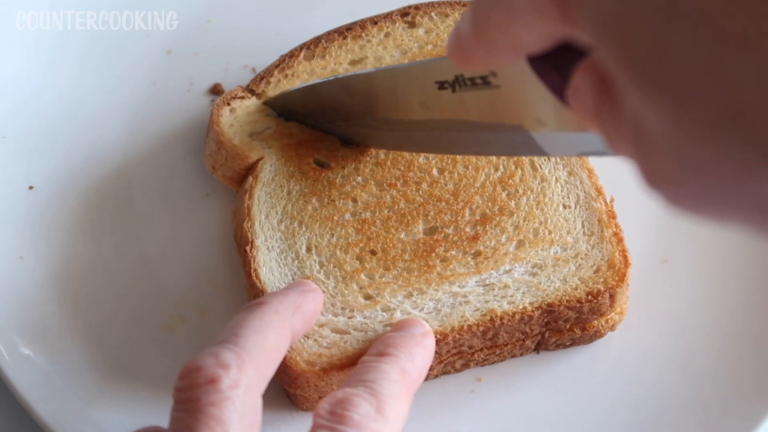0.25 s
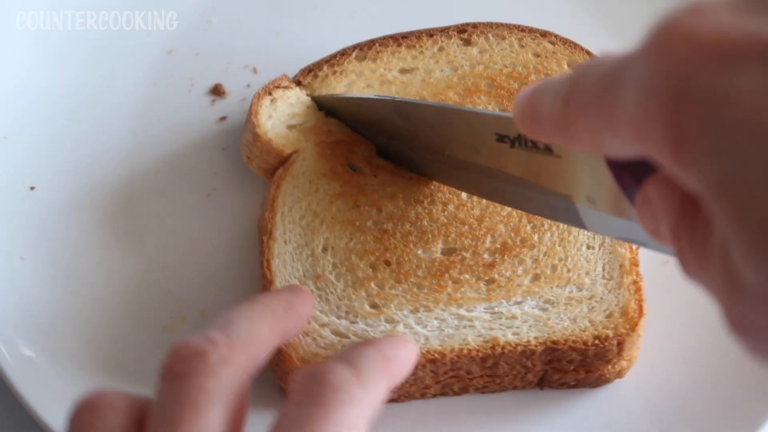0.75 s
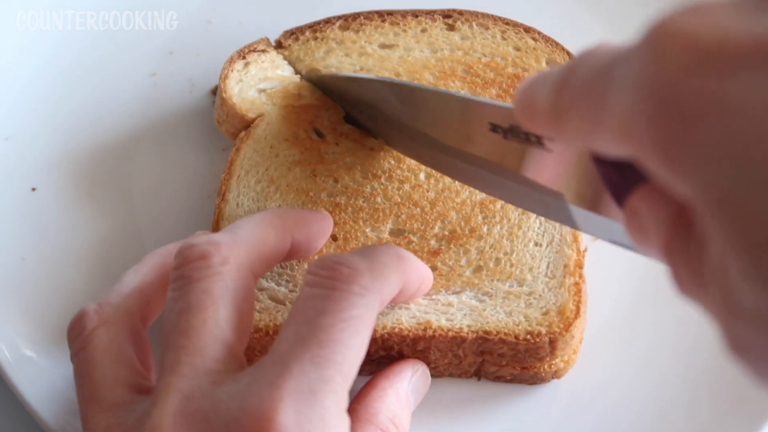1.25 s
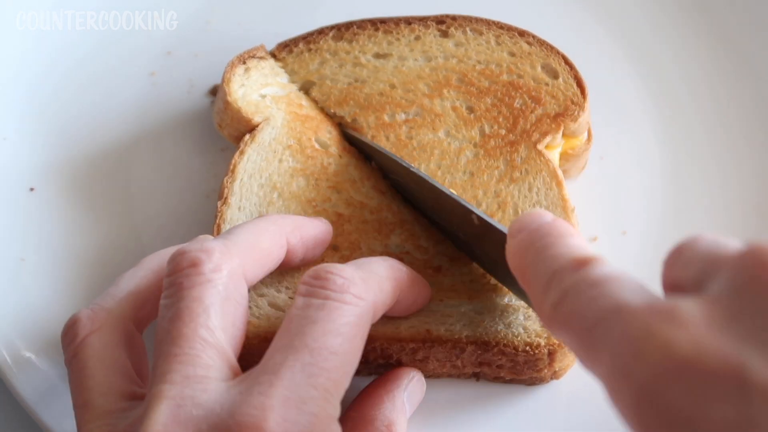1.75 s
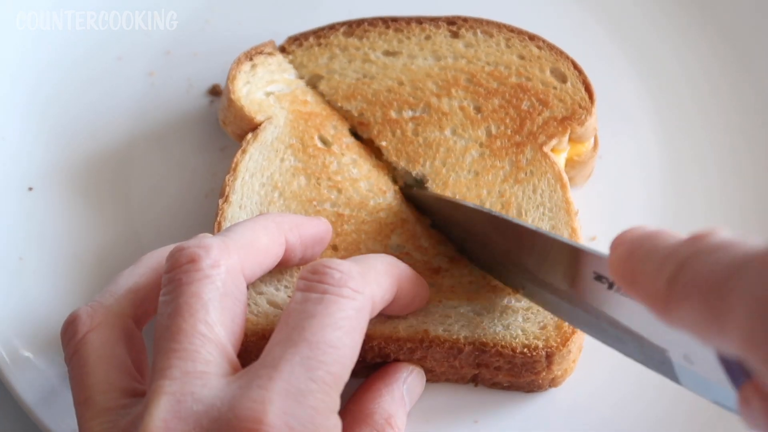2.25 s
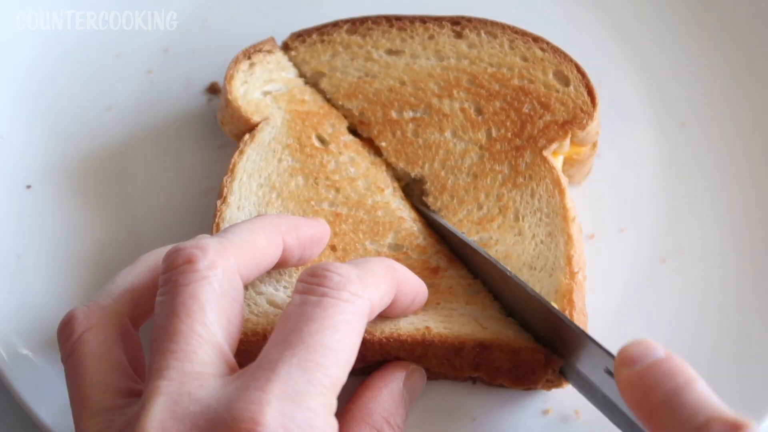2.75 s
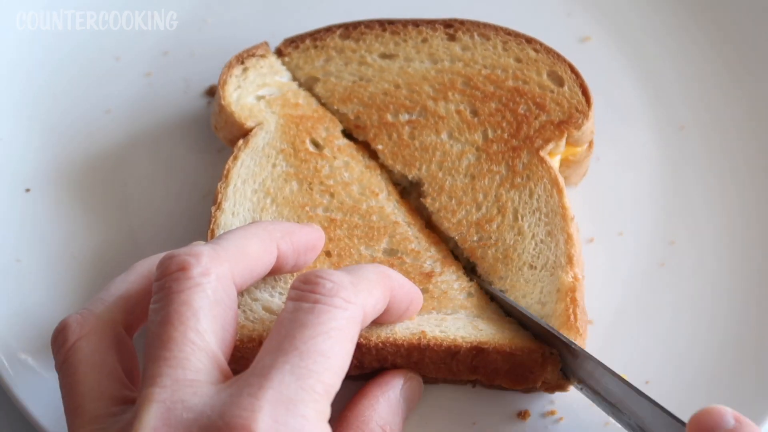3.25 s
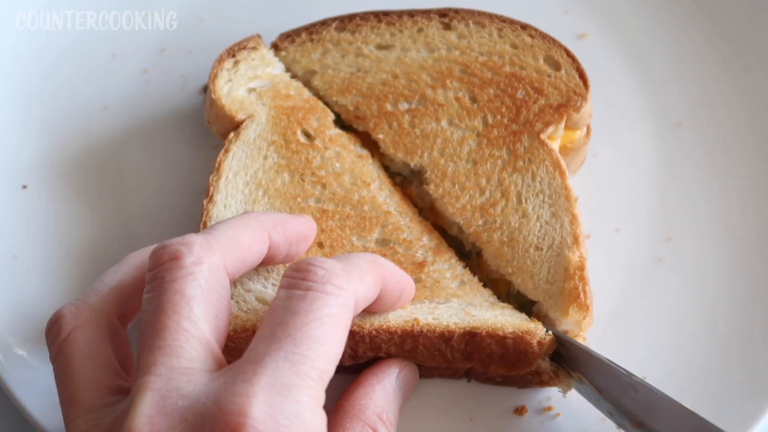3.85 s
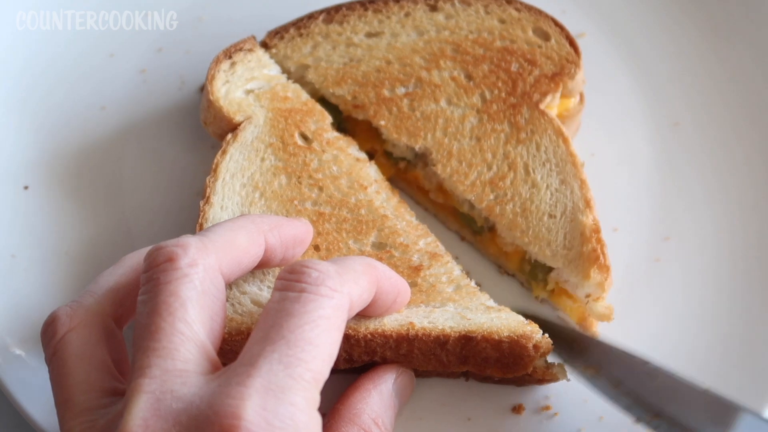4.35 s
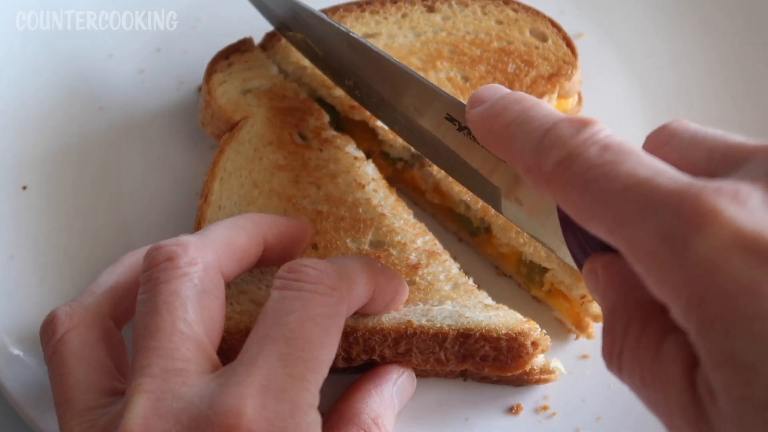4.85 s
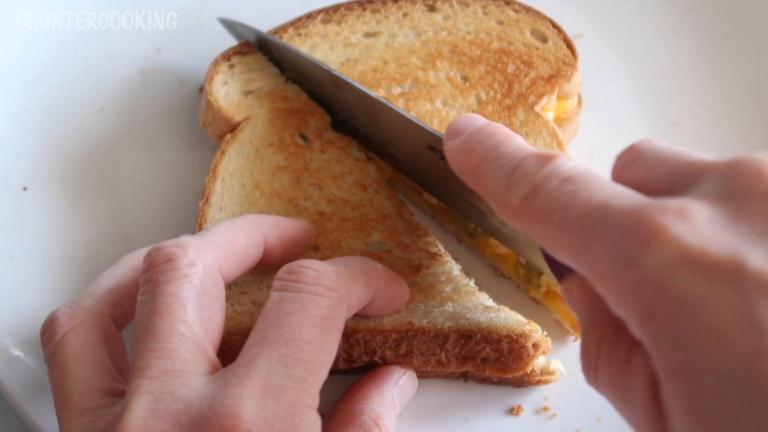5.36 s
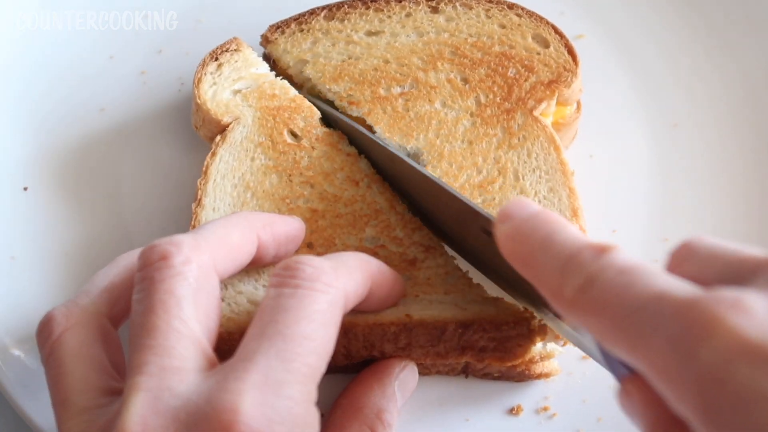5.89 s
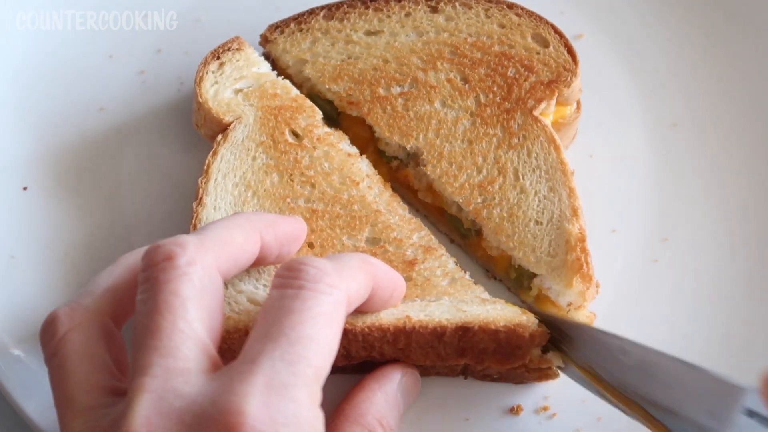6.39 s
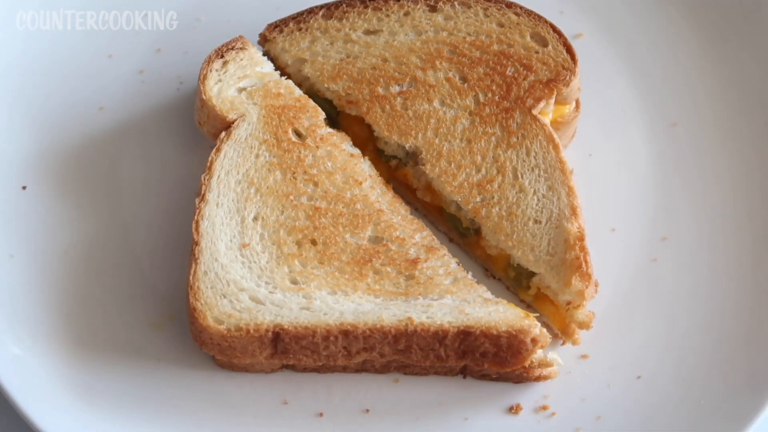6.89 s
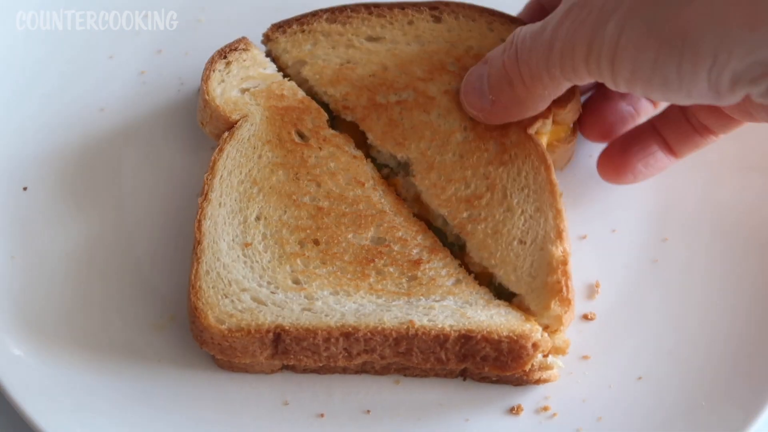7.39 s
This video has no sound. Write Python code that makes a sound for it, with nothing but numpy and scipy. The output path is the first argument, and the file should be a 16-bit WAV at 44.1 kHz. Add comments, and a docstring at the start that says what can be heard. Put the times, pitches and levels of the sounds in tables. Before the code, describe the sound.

A quiet kitchen, heard very close in stereo, with soft air noise and a faint, distant fan hum. From 0 to about 2.7 seconds a knife saws through toasted bread in short, uneven strokes: dry, grainy crackle, separate brittle snaps, low soft table bumps and small ceramic clinks, firmer near 1.6 and 2.4. From 2.9 to 3.8 the crunching thins, with light blade taps around 3.3 to 3.4. At 4.0 the blade hits the plate with a loud, sharp, bright clack, by far the strongest sound, briefly ringing and chattering; the background dips, then slowly returns. Small scrapes and ticks follow until 4.5, then near quiet. A rub and firm knock come at 5.3 to 5.6, faint scraping at 5.9 to 6.4. At 6.8 the knife is softly laid on the table. Near 7.4 fingers press the crust with a few small, crisp crackles.

```python
"""Toasted sandwich, sawn with a knife

Quiet kitchen, ceramic plate on a table, stereo microphones close by. Filtered noise and clicks make the crust
crackle and snap; knocks and small slips ring the plate's modes; pushes and hard knocks rumble in the table's.
Late on, the knife is laid on the table and fingers press the crust. Short feedback delays give the room, noise
and narrow wavering tones its air and a far-off fan; the gain control ducks after loud sounds, recovering slowly."""
import sys
import numpy as np
from scipy import signal
from scipy.fft import rfft, irfft, next_fast_len
from scipy.io import wavfile

SR = 44100
rng = np.random.default_rng(int(sys.argv[2]) if len(sys.argv) > 2 else 0)


def volts_from_decibels(level):
    """Turn decibel levels (scalar or array-like) into linear amplitude factors."""
    exponent = np.asarray(level, float) / 20
    return 10 ** exponent


def bounce(signal):
    """Save signal as a 16-bit WAV file at the path given by the first command-line argument."""
    frames = np.transpose(np.atleast_2d(signal))
    limited = np.clip(frames, -1, 1)
    pcm = np.round(limited * 32767).astype(np.int16)
    wavfile.write(sys.argv[1], SR, pcm)


N = 336483

# room and microphone noise, relative spectrum: hz, level_db
AIR_SPECTRUM = [(12, -41), (20, -6.5), (74, -9), (113, -5), (154, -8), (301, -10.5), (377, -8.5),
                (698, -16.5), (1060, -18), (1370, -19), (4300, -26), (12800, -35.5), (16000, -75)]
AIR_RMS_DB = -47
# left-right likeness of that noise: hz, likeness (-1 to 1)
AIR_LIKENESS = [(60, 1), (180, 0.63), (550, 0.012), (1650, 0.05), (4970, -0.14), (15000, -0.97)]
# tones of the distant fan: pitch_hz, rms_db, width_hz
FAN_TONES = [(59.4, -60, 3.0), (355, -60, 2.4), (380.6, -53, 0.66), (421, -60.5, 2.7), (13006, -86, 30.0)]

# crust crackling under the saw strokes, and at the end under pressing fingers:
# start_s, length_s, share before the peak (0 to 1), crackle_db
CRACKLING = [(0, 0.023, 0.077, -44), (0.048, 0.16, 0.27, -45), (0.147, 0.12, 0.44, -31.5),
             (0.362, 0.08, 0.47, -44), (0.449, 0.16, 0.48, -37.5), (0.602, 0.26, 0.34, -36.5),
             (0.975, 0.068, 0.79, -47), (1.145, 0.26, 0.28, -40), (1.436, 0.11, 0.81, -32),
             (1.559, 0.05, .35, -36.5), (1.642, 0.24, 0.25, -32.5), (1.927, 0.33, 0.48, -39),
             (2.294, 0.16, 0.081, -38), (2.518, 0.22, 0.14, -33), (2.797, 0.12, 0.39, -54.5),
             (2.93, 0.23, 0.36, -46), (3.158, 0.069, 0.39, -50), (3.261, 0.085, 0.99, -39),
             (3.386, 0.24, 0.52, -43.5), (3.703, 0.051, 0.66, -46), (3.82, 0.1, 0.82, -50),
             (4, 0.087, .05, -33), (4.2, 0.094, 0.76, -45.5), (4.448, 0.05, 0.39, -53.5),
             (4.847, 0.052, 0.43, -50.5), (5.261, 0.044, 0.59, -44), (5.323, 0.19, 1, -41),
             (5.515, 0.2, .15, -42.5), (5.924, 0.091, 0.22, -48.5), (5.976, 0.22, 0.82, -50.5),
             (6.337, 0.2, 0.2, -50.5), (7.362, 0.076, 0.3, -46.5)]
# crust crackle, relative spectrum: hz, level_db
CRUST_SPECTRUM = [(290, -43), (500, -14), (1000, -19), (2200, -12), (2800, -8.5), (4600, -4.5), (7900, -11),
                  (13300, -13), (15500, -27)]
# left-right likeness of the crackle: hz, likeness (-1 to 1)
CRUST_LIKENESS = [(500, 0.822), (2000, 1), (5000, 0.73), (12000, 0.18)]
# blade modes that colour the crackle: pitch_hz, middle level_db re crackle, t60_s
BLADE_MODES = [(2660, -16.5, 0.04), (2960, -15.5, 0.017), (3560, -21, 0.014), (3904, -17, 0.0045),
               (5160, -20, 0.02)]
# pieces of crust snapping: start_s, relative level_db, centre_hz
SNAPS = [(0.06, -27, 5000), (0.096, -37, 2660), (0.472, -19.5, 2660), (0.62, -22.5, 2800),
         (0.7356, -23, 2520), (0.7872, -24, 2680), (0.971, -35.5, 2700), (1.008, -33, 2900),
         (1.016, -39, 2720), (1.114, -37.5, 4500), (1.1653, -18, 2820), (1.2125, -19.5, 2680),
         (1.4362, -19.5, 2790), (1.461, -22, 2680), (1.482, -12.5, 2770), (1.5207, -34, 2670),
         (1.65, -15.5, 1620), (1.779, -22, 2960), (1.8482, -20.5, 1940), (1.8653, -28, 2600),
         (2.049, -26, 1500), (2.075, -25, 4700), (2.094, -31.5, 4700), (2.2857, -30, 2630),
         (2.5381, -26, 2240), (3.5268, -31, 1500), (3.539, -31.5, 4990), (3.567, -33, 1500),
         (3.725, -37, 2190), (4.2205, -31, 4800), (5.121, -30, 2680), (5.923, -29, 2600),
         (6.4044, -35, 2118), (7.3605, -24, 1650), (7.372, -26.5, 2650), (7.379, -21.5, 1650),
         (7.434, -30, 2300), (7.497, -32.5, 2943)]

# low rumble of the table under pushes and hard knocks: start_s, length_s, share before the peak (0 to 1), rumble_db
RUMBLING = [(0.163, 0.094, 0.72, -32), (.36, 0.1, .4, -48.5), (0.496, 0.1, 0.31, -31.5),
            (0.619, 0.19, 0.35, -35), (1.16, 0.17, 0.33, -48), (1.452, 0.19, 0.87, -33),
            (1.668, 0.22, 0.43, -35), (2.302, 0.17, 0.81, -33.5), (2.518, 0.22, 0.31, -36),
            (3.265, 0.3, 0.56, -36), (3.677, 0.089, .45, -44.5), (3.992, .14, .1, -24),
            (4.196, 0.13, 0.67, -36.5), (5.404, 0.16, .8, -31), (5.568, 0.2, 0.33, -35.5),
            (6.17, 0.3, 0.27, -36), (7.35, 0.054, 0.49, -48)]
# table modes: pitch_hz, relative level_db, t60_s
TABLE_MODES = [(61.6, -13.5, 0.1), (120, 0, 0.043), (153, -3, 0.07), (234, -7, 0.039), (305.2, 0, 0.04),
               (580, -13, 0.081)]
HAND_REST_DB = -59.5  # least rumble: the hand resting on the bread

# blade meets plate, relative levels: start_s, thud near 340 Hz_db, ring near 1500 Hz_db,
# ring near 2280 Hz_db, hard tick_db
KNOCKS = [(0.293, -36, -40, -37.5, -38.5), (0.527, -42, -20, -18.5, -32.5), (0.686, -56, -28.5, -39, -40),
          (0.739, -43, -31, -51, -39), (1.567, -50, -27, -57, -56), (1.584, -23.5, -14.5, -10, -29.5),
          (2.403, -40, -19.5, -40, -35), (2.414, -26, -19.5, -5.5, -19.5), (2.599, -35, -39, -28, -45),
          (2.679, -49, -32.5, -31, -34), (3.17, -44.5, -29, -41.5, -42), (3.253, -44, -39.5, -46, -47),
          (3.330, -37, -23.5, -36, -32), (3.335, -35, -30.5, -17.5, -24), (3.399, -23.5, -29.5, -26, -29),
          (3.413, -25.5, -39, -33, -39), (3.999, -36.5, -43, -23, -19.5), (4.004, -14.5, -18.5, 8, -0.5),
          (4.037, -38.5, -30, -15.5, -18.5), (4.407, -48, -39.5, -26, -41), (5.333, -51.5, -37, -45, -42.5),
          (5.458, -53, -28, -41.5, -36), (5.518, -24, -14.5, -15.5, -10.5), (6.186, -57, -39, -44, -61),
          (6.214, -38, -51, -37, -64)]
# band centres of a knock, with a band near 800 Hz added after the thud: pitch_hz
KNOCK_BANDS_HZ = [340, 800, 1500, 2280, 3600]
# modes favoured by where the blade lands: knock_s, favoured pitch_hz (one or more)
FAVOURED = [(0.527, 1412), (1.584, 845, 2625), (2.414, 845, 2625, 3965), (3.334, 2222, 2930),
            (3.400, 303, 783, 1740), (4.0041, 337, 688), (4.038, 2395), (4.408, 845, 2320),
            (5.518, 2222, 3050, 3830, 5590), (6.186, 1412), (6.215, 580)]
# blade clear of the bread, so it bounces off and lets the plate ring: start_s, end_s
BLADE_FREE_S = (3.9, 4.6)
# blade rubbing the plate, the plate ringing on after hard knocks, a late finger press; relative levels:
# start_s, length_s, share before the peak (0 to 1), low ring_db, high ring over low ring_db
PLATE_SWELLS = [(0.191, 0.074, 0.47, -34, -28), (0.462, 0.085, 0.39, -47.5, 12.5),
                (0.624, 0.082, .3, -53, 12), (0.66, 0.093, 0.19, -38.5, -5), (0.917, 0.1, 0.19, -50.5, -8),
                (1.16, 0.32, 0.17, -52.5, 0), (1.529, 0.073, 0.49, -35, -21), (1.638, 0.26, 0.22, -32, -38),
                (1.677, 0.098, 0.4, -45, 16), (1.899, 0.2, 0.95, -48, -16), (2.155, 0.071, 0.57, -48, 6),
                (2.307, 0.11, 1, -30.5, -9.5), (2.43, 0.077, 0.42, -59, 5), (2.529, 0.21, 0.13, -34, -21),
                (2.624, 0.12, 0.84, -33.5, 1.5), (2.8, 0.074, 0.63, -43, -17), (2.94, 0.14, 0.36, -51, -2),
                (3.147, 0.046, 0.34, -47, -22), (3.26, 0.088, 0.94, -33.5, 1.5),
                (3.55, 0.065, 0.68, -48.5, -18), (3.72, 0.2, 0.65, -58.5, 14),
                (3.837, 0.069, 0.83, -54.5, -14), (4.015, 0.18, 0.34, -47, 25),
                (4.197, .11, 0.42, -43, 6.5), (4.33, 0.11, 0.86, -51.5, 3), (5.32, 0.19, 0.38, -44, -3),
                (5.458, 0.081, 0.65, -32, -4), (5.53, 0.23, 0.098, -43, 3.5),
                (5.9, 0.33, 0.37, -44.5, -1.5), (6.131, 0.13, 0.38, -34, -6.5),
                (6.222, 0.15, 0.45, -47, 0.5), (6.327, .19, 0.4, -47.5, 1.5), (7.36, 0.053, 0.12, -46, 8)]
# plate and blade modes: pitch_hz, relative level_db, t60_s when ringing free
PLATE_MODES = [(302.6, -4.5, 0.16), (341, -1.5, 0.099), (443.3, -6, 0.13), (580, -8.5, 0.035),
               (681.4, -11, 0.11), (781, -6, 0.16), (849.3, -4, 0.08), (955, -4, 0.061),
               (1419.4, -2.5, 0.071), (1501, 2, 0.04), (1714, -3.5, 0.03), (2219, 0.5, 0.036),
               (2303, -16.5, 0.22), (2380, -11.5, 0.066), (2455, -11.5, 0.048), (2660, -9, 0.042),
               (2790, -14.5, 0.056), (2908, -10, 0.033), (3070, -12, .04), (3310, -12.5, 0.07),
               (3690, -11.5, 0.097), (3720, -11, 0.066), (3857, -5, 0.035), (3900, -15, 0.04),
               (4700, -18, 0.066), (5070, -12, 0.05), (5457, -13.5, 0.14), (5610, -6.5, 0.03),
               (5665, -11.5, .06), (6850, -14, 0.035), (7640, -18.5, 0.07), (8750, -12.5, 0.066),
               (11150, -20, 0.2)]
FAVOUR_DB, SCATTER_DB = 8.5, 1.5  # gain of a favoured mode; chance in how hard each mode is struck
UNDER_THUD_DB, UNDER_RING_DB = -5, -14.5  # the 800 Hz band's part of the thud and of the 2280 Hz ring
# chatter on the table after a knock: level re knock in the top modes, decay; wavering of the free ring
CHATTER_DB, CHATTER_T60_S, WAVER_DB = -38.5, 0.28, 4

# knife laid on the table, soft touches: start_s, relative level_db
LAID_DOWN = [(6.794, -41), (6.802, -34.5), (6.809, -36), (6.818, -34.5)]
# handle and table-top modes: pitch_hz, relative level_db, t60_s
KNIFE_ON_TABLE = [(154, -18, 0.06), (302, 7, 0.043), (447, 2, 0.05), (1034, 4, 0.054), (1310, 1.5, 0.022),
                  (1980, 4, 0.014), (2460, -4, 0.031), (3770, -15, .01), (5060, -8, 0.012)]

CRACKLE_SAG_DB, PLATE_SAG_DB, RUMBLE_SAG_DB = 13, 13, 15  # fall from a swell's peak to its two ends
SAG_CURVE, LIFT_DB_PER_S = 1.255, 497  # roundness of the swell; further fall outside it
KITCHEN_T60_S, WALL_CUT_HZ, KITCHEN_DB = 0.3, 5400, -24
MIC_TOP_HZ = 14800
DUCK_ABOVE_DB, DUCK_ATTACK_S, RECOVER_DB_PER_S = -8, 0.016, 7.0


def rms_one(x):
    """Scales to rms 1."""
    return x / np.sqrt(np.mean(x ** 2) + 1e-20)


def at_hz(points, hz):
    """Reads (Hz, value) points on a log-frequency axis."""
    points = np.array(points)
    return np.interp(np.log(hz), np.log(points[:, 0]), points[:, 1])


def filtered(x, order, edge_hz, kind):
    """Butterworth filter along the last axis."""
    return signal.sosfilt(signal.butter(order, edge_hz, kind, fs=SR, output="sos"), x)


def drift(rate_hz):
    """Slow noise of spread 1 that changes about rate_hz times a second, drawn at an eighth of SR."""
    r = np.exp(-16 * np.pi * rate_hz / SR)
    slow = signal.lfilter([1], [1, -2 * r, r * r], rng.standard_normal(N // 8 + 4002))
    slow = rms_one(slow[4000:])  # drop the filter's start
    return np.interp(np.arange(N) / 8, np.arange(len(slow)), slow)


def ring(force, hz, t60_s):
    """One mode as a two-pole resonator: a unit click sets a dying sine of height 1 ringing."""
    r, w = volts_from_decibels(-60 / (t60_s * SR)), 2 * np.pi * hz / SR
    return signal.lfilter([0, np.sin(w)], [1, -2 * r * np.cos(w), r * r], force + 1e-18)


def grains(per_s, spread_db, clump_db):
    """Random clicks of uneven size and either sign, whose level wanders so that they clump."""
    sizes = volts_from_decibels(spread_db * np.minimum(rng.exponential(1, N), 5)) * rng.choice([-1, 1], N)
    happens = rng.random(N) < per_s / SR
    return rms_one(sizes * happens * volts_from_decibels(clump_db * drift(25.0)))


def coloured(mid, side, spectrum, likeness):
    """Gives two raw signals a spectrum and mixes them to a stereo pair of the given likeness."""
    size = next_fast_len(N)
    hz = np.maximum(np.arange(size // 2 + 1) * SR / size, 1)
    alike = np.clip(at_hz(likeness, hz), -1, 1)
    shared = np.sqrt(1 + alike) * rfft(mid, size)
    opposed = np.sqrt(1 - alike) * rfft(side, size) * [[1], [-1]]
    pair = (shared + opposed) * volts_from_decibels(at_hz(spectrum, hz))
    return rms_one(irfft(pair, size)[:, :N])


def swells(rows, sag_db, peaks_db):
    """Level in dB of a run of swells, each rising to a peak and sagging; overlapping ones add in power."""
    t, power = np.arange(0, N, 32) / SR, 1e-12
    for (start, length, share, *_), peak_db in zip(rows, peaks_db):
        rise = length * np.clip(share, 0.02, 0.98)
        peak_s = start + rise
        far = np.where(t < peak_s, (peak_s - t) / rise, (t - peak_s) / (length - rise))
        outside_s = np.maximum(np.maximum(start - t, t - start - length), 0)
        fall_db = sag_db * np.minimum(far, 1) ** SAG_CURVE + LIFT_DB_PER_S * outside_s
        power = power + volts_from_decibels(peak_db - fall_db) ** 2
    return np.interp(np.arange(N) / SR, t, 10 * np.log10(power))


def air():
    """Room and microphone noise is shaped noise; the far fan's wavering tones are noise in narrow resonators."""
    out = volts_from_decibels(AIR_RMS_DB) * coloured(*rng.standard_normal((2, N)), AIR_SPECTRUM, AIR_LIKENESS)
    for hz, level_db, width_hz in FAN_TONES:
        t60_s = np.log(1000) / np.pi / width_hz
        out = out + volts_from_decibels(level_db) * rms_one(ring(rng.standard_normal(N), hz, t60_s))
    return out


def crust(crackle_db):
    """Thousands of cells break in the crust, heard on both sides with different fine colour."""
    cells = np.abs(grains(per_s=6000.0, spread_db=-1.5, clump_db=2.0))
    cells = np.abs(signal.lfilter([1], [1, -0.93], cells))
    crumbs = np.abs(grains(per_s=65.0, spread_db=4.0, clump_db=-2.0))  # larger pieces, heard singly
    crumbs = signal.lfilter([1], [1, -0.985], crumbs)
    breaks = rms_one(cells) + 0.35 * rms_one(crumbs)
    mid, side = breaks * rng.standard_normal((2, N))
    crisp = coloured(mid, side, CRUST_SPECTRUM, CRUST_LIKENESS)
    for hz, level_db, t60_s in BLADE_MODES:  # the modes sing along, their level wandering
        crisp = crisp + volts_from_decibels(level_db + 6.0 * drift(14.0)) * rms_one(ring(mid, hz, t60_s))
    return volts_from_decibels(crackle_db) * crisp


def table(rumble_db):
    """Uneven force, a run of clicks, shakes the low modes of the table into a rumble."""
    force = grains(per_s=900.0, spread_db=2.5, clump_db=4.0)
    shake = sum(ring(force * volts_from_decibels(level_db), hz, t60_s) for hz, level_db, t60_s in TABLE_MODES)
    return volts_from_decibels(rumble_db) * rms_one(filtered(shake, 2, 70.0, "high"))


def kitchen(x):
    """Room echo: eight feedback delays a side, duller on every round."""
    size = next_fast_len(N + SR)
    turn = np.exp(-2j * np.pi * np.arange(size // 2 + 1) / size)  # one sample of delay
    dull = np.exp(-2 * np.pi * WALL_CUT_HZ / SR)
    wall = (1 - dull) / (1 - dull * turn)
    answer = np.zeros((2, len(turn)), complex)
    for k, lag in enumerate((rng.uniform(0.004, 0.03, 16) * SR).astype(int)):
        loop = volts_from_decibels(-60 * lag / SR / KITCHEN_T60_S) * wall * turn ** lag
        answer[k % 2] += loop / (1 - loop) * (-1) ** (k // 2)
    answer = answer + 0.95 * answer[::-1]  # close microphone ports hear much the same room
    return irfft(answer * rfft(x, size), size)[:, :N]


def snaps():
    """Each snap of crust is a short burst of dying noise, broad with a hump at its own pitch."""
    out, t = np.zeros((2, N)), np.arange(int(0.033 * SR)) / SR
    decay = volts_from_decibels(-60 * t / 0.023) + 0.31 * volts_from_decibels(-60 * t / 0.09)
    shape = decay * (1 - np.exp(-t / 0.0013))
    for s, level_db, hz in SNAPS:
        mid, side = rng.standard_normal((2, len(t)))
        burst = (mid + 0.08 * side * np.array([[1], [-1]])) * shape
        hump = filtered(burst, 1, [hz * 0.88, hz * 1.177], "band")
        broad = filtered(burst, 2, 1800.0, "high")
        i = round(s * SR)
        out[:, i:i + len(t)] += (volts_from_decibels(level_db + 5.0) * (hump + 0.07 * broad))[:, :N - i]
    return out


def knock_colours(knocks):
    """How hard each knock (row) strikes each plate mode (column), in dB, by where the blade lands."""
    modes_hz = np.array(PLATE_MODES)[:, 0]
    colour_db = np.array([np.interp(np.log(modes_hz), np.log(KNOCK_BANDS_HZ), row[1:]) for row in knocks])
    for s, *favoured_hz in FAVOURED:
        knock = np.argmin(np.abs(knocks[:, 0] - s))
        modes = [np.argmin(np.abs(modes_hz - hz)) for hz in favoured_hz]
        colour_db[knock, modes] += FAVOUR_DB
    return colour_db


def plate(low_db, high_db):
    """Knocks strike every mode of plate and blade; small slips feed the modes in longer swells."""
    knocks = np.array(KNOCKS)
    between = volts_from_decibels(knocks[:, 1] + UNDER_THUD_DB) ** 2 + volts_from_decibels(knocks[:, 3] + UNDER_RING_DB) ** 2
    knocks = np.insert(knocks, [2], 10 * np.log10(between)[:, None], axis=1)  # the band near 800 Hz
    start_s = knocks[:, :1]
    free = (start_s > BLADE_FREE_S[0]) & (start_s < BLADE_FREE_S[1])
    t = np.arange(int(0.058 * SR)) / SR
    at = np.round(start_s * SR).astype(int) + np.arange(len(t))
    # the edge skids a few ms; weak touches are slower
    skid_s = 0.0025 + 0.00065 * np.maximum(-18 - knocks[:, 1:].max(axis=1, keepdims=True), 0)
    skid = (1 - np.exp(-16.0 * t / skid_s)) * volts_from_decibels(-60 * t / skid_s)
    colours_db = knock_colours(knocks)
    phases = rng.uniform(0, 2 * np.pi, colours_db.shape)
    scatter_db = SCATTER_DB * rng.normal(0, 1, colours_db.shape)
    slips = grains(per_s=3500.0, spread_db=4.5, clump_db=2.0)
    rattle = grains(per_s=6000.0, spread_db=1.5, clump_db=-0.5)
    out = np.zeros((2, N))
    for k, (hz, level_db, t60_s) in enumerate(PLATE_MODES):
        struck_db = colours_db[:, k] + level_db
        bounced, pressed, jolts = np.zeros((3, N))
        swing = skid * np.cos(2 * np.pi * hz * t + phases[:, k:k + 1])  # the part of each skid at this pitch
        strength = volts_from_decibels(struck_db + 3.0 + scatter_db[:, k]) / skid.sum(axis=1)
        blows = 2 * swing * strength[:, None]
        np.add.at(bounced, at, blows * free)
        np.add.at(pressed, at, blows * ~free)

        # the plate chatters on the table, mostly in its upper modes
        jolts[at[:, 0]] = volts_from_decibels(struck_db + CHATTER_DB + 8.9 * min(np.log2(hz / 3800.0), 0))
        dying = signal.lfilter([1], [1, -volts_from_decibels(-60 / (CHATTER_T60_S * SR))], jolts + 1e-18)
        chatter = np.roll(rattle, 1000 * k) * dying

        # slips reach the middle modes best
        share = np.clip(np.log(hz / 1500.0) / np.log(1.45), 0, 1)
        away_db = -9.0 * abs(np.log2(hz / 1880.0)) ** 0.95 - 3.0 * max(np.log2(hz / 2200.0), 0)
        slipping = slips * volts_from_decibels(low_db + share * (high_db - low_db) + level_db + away_db - 23.5)

        free_ring = ring(bounced + slipping, hz, t60_s) * volts_from_decibels(WAVER_DB * drift(40.0))
        damped_ring = ring(pressed + chatter, hz, min(0.75 * t60_s, 330.0 / hz))  # the pressed blade damps
        sound = free_ring + damped_ring
        # high modes reach the two sides out of step
        lean = np.clip(0.092 + (hz / 18000.0) ** 2, 0, 0.85) * (-1) ** k
        late = lean * np.roll(sound, round(SR / hz / 4))
        out += np.array([sound + late, sound - late]) / np.sqrt(1 + lean ** 2)

    # the contact itself is heard as a broad tick
    tick = rng.standard_normal(at.shape) * skid / np.sqrt(np.sum(skid ** 2, axis=1, keepdims=True))
    contact = np.zeros(N)
    np.add.at(contact, at, tick * volts_from_decibels(knocks[:, 5:] + 6.0))
    return out + filtered(contact, 2, [60.0, 7000.0], "band")


def laid_down():
    """A few soft, scuffing touches, short swells of noise, ring handle and table top."""
    touches = np.zeros(N)
    for s, level_db in LAID_DOWN:
        i = round(s * SR)
        touches[i:i + 300] += volts_from_decibels(level_db - 24.5) * np.hanning(300) * rng.standard_normal(300)
    return sum(volts_from_decibels(level_db) * ring(touches, hz, t60_s) for hz, level_db, t60_s in KNIFE_ON_TABLE)


def scene():
    """Close sources around the middle, their echo in the kitchen, and the air."""
    crackling, rumbling, ringing = np.array(CRACKLING), np.array(RUMBLING), np.array(PLATE_SWELLS)
    crackle_db = swells(crackling, CRACKLE_SAG_DB, crackling[:, 3])
    rumble_db = np.maximum(swells(rumbling, RUMBLE_SAG_DB, rumbling[:, 3]), HAND_REST_DB)
    low_db = swells(ringing, PLATE_SAG_DB, ringing[:, 3])
    high_db = swells(ringing, PLATE_SAG_DB, ringing[:, 3] + ringing[:, 4])
    close = crust(crackle_db) + table(rumble_db) + snaps() + plate(low_db, high_db) + laid_down()
    return close + volts_from_decibels(KITCHEN_DB) * kitchen(close.mean(axis=0)) + air()


def band_limit(x):
    """A steep low-pass at the top of the band."""
    return signal.sosfilt(signal.butter(12, 21850, fs=SR, output="sos"), x)


def record(dry):
    """Gain control ducks after loud sounds and recovers slowly; peaks that pass before it acts are clipped."""
    heard = filtered(dry, 8, MIC_TOP_HZ, "low")
    r, t = np.exp(-1 / (DUCK_ATTACK_S * SR)), np.arange(N) / SR
    power = signal.lfilter([1 - r], [1, -r], np.mean(heard ** 2, axis=0))
    over_db = np.maximum(10 * np.log10(power + 1e-12) - DUCK_ABOVE_DB, 0)
    recovery_db = RECOVER_DB_PER_S * t
    held_db = np.maximum.accumulate(over_db + recovery_db) - recovery_db
    duck_db = signal.lfilter([1 - r], [1, -r], held_db)
    mix = np.clip(heard * volts_from_decibels(-duck_db), -0.99, 0.99)
    return band_limit(mix)


dry = scene()
out = record(dry)
bounce(out)
```